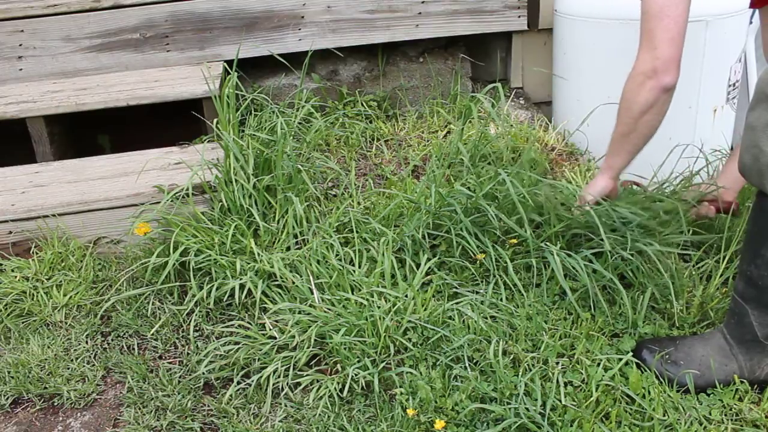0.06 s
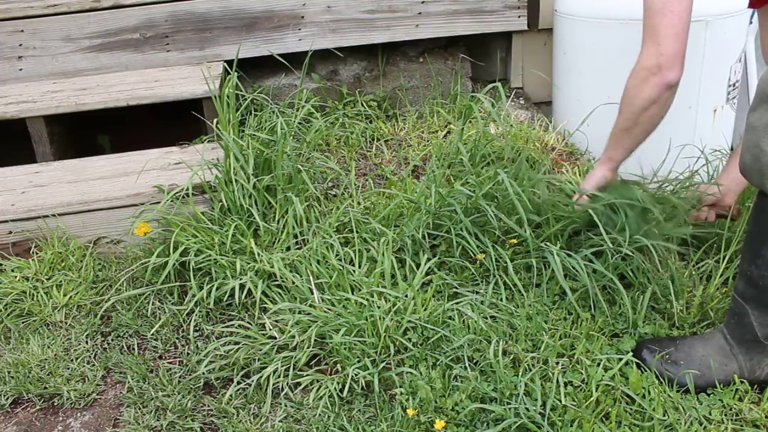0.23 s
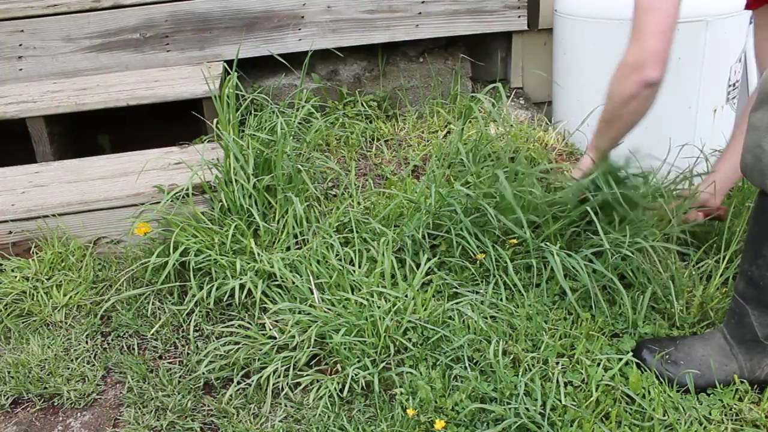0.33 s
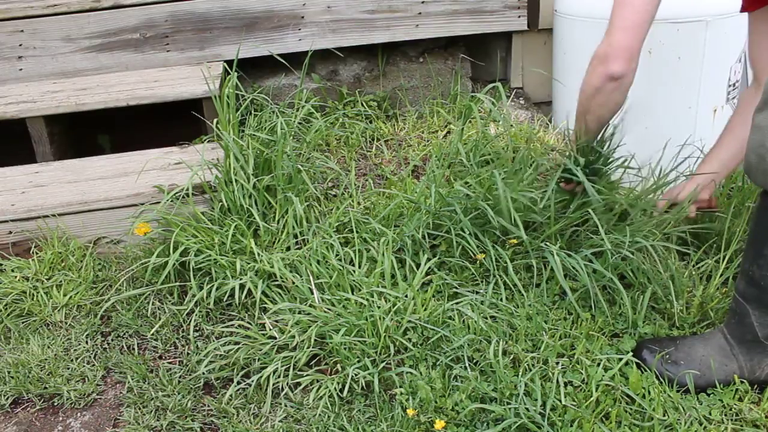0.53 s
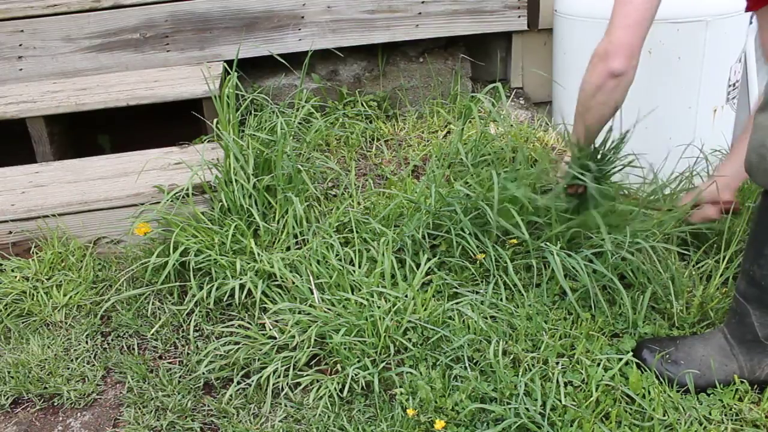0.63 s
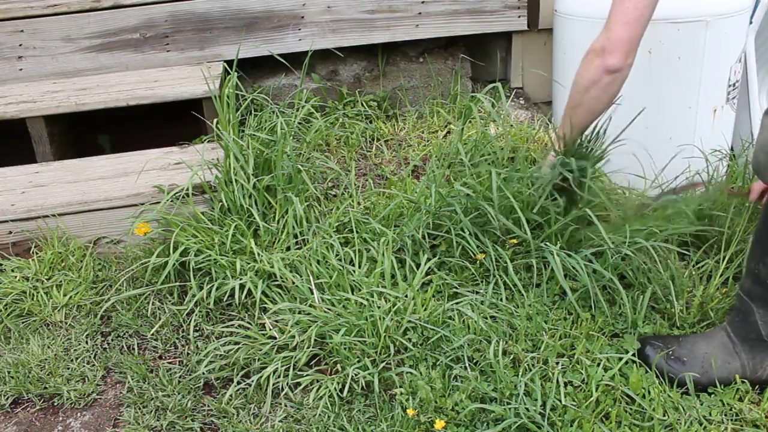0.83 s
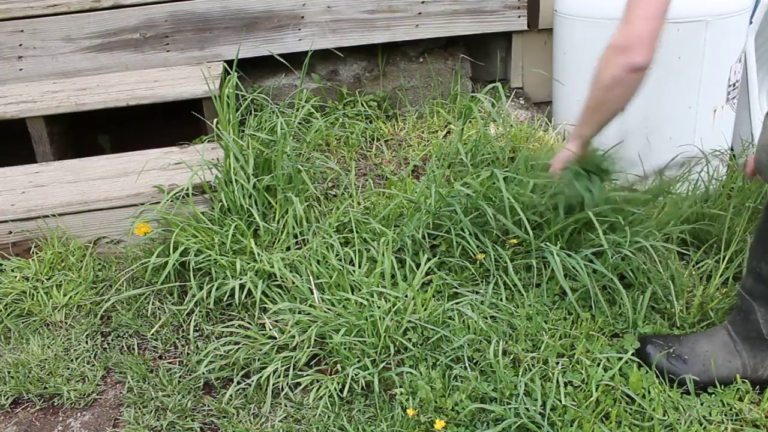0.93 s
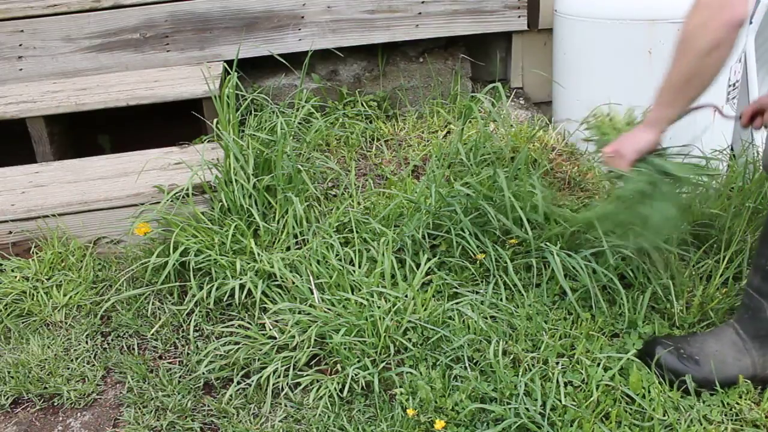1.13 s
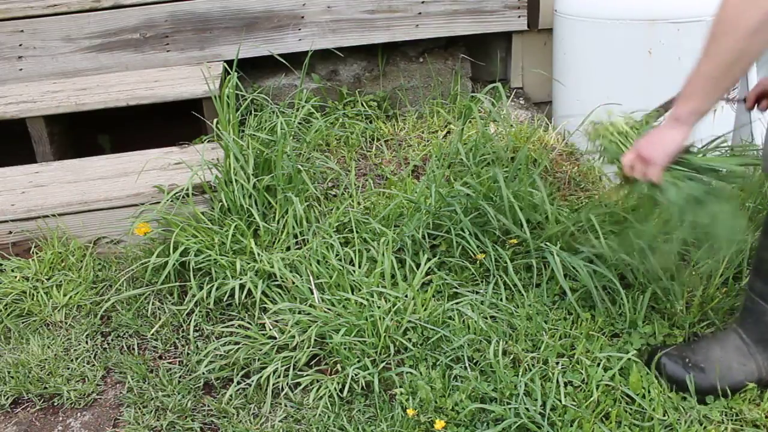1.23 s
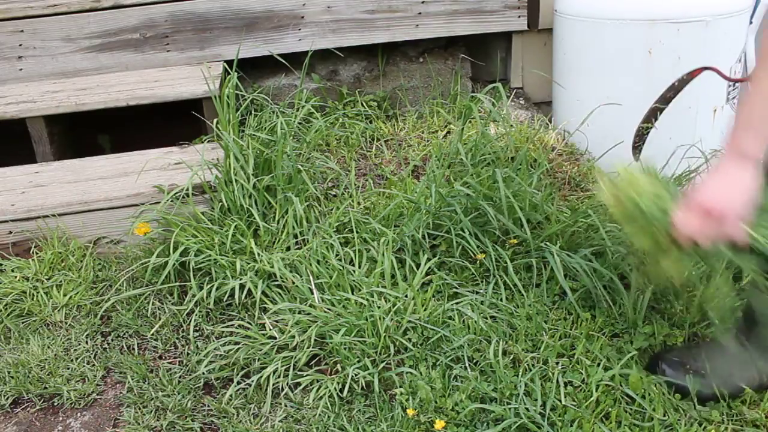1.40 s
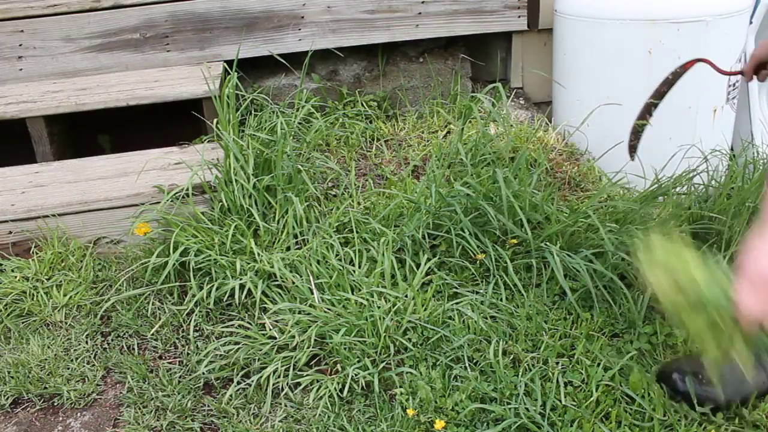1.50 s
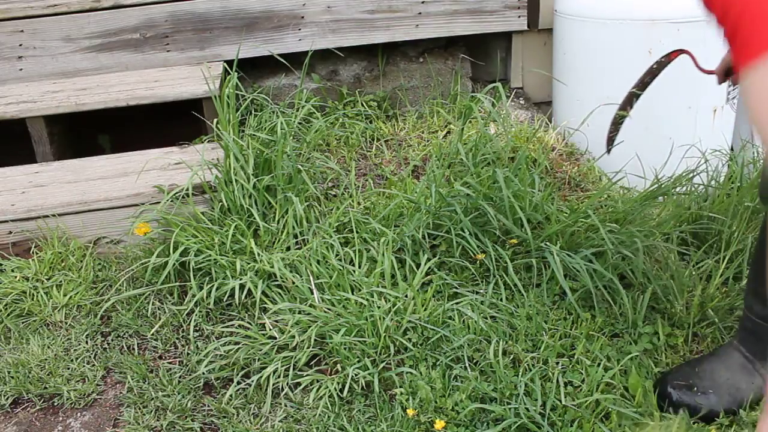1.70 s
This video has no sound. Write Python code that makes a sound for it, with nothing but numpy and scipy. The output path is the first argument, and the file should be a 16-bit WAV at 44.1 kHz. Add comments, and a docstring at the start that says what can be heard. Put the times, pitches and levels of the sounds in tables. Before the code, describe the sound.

A curved blade cuts through tall grass, close by in a quiet yard. First the gathered leaves rustle and tick, with a small snap near 0.25 seconds. From 0.6 to 0.85 seconds comes the cut, a tearing rasp with quick stalk snaps and a faint steel ring, loudest at 0.75. The bunch then lifts away with a soft swish around 1.3 seconds, and a boot bumps the turf faintly near 1.4.

```python
"""A curved steel hook cuts through a bunch of tall grass: fibres tear with a rasp, and the
hollow stalks break in a quick run of snaps that make the blade ring. First a hand gathers the
grass, so the leaves rustle and tick; afterwards the cut bunch is lifted away with a swish.
A boot shifts on the turf, and a house wall close by adds short echoes. The sound is mono."""
import sys
import numpy as np
from scipy import signal
from scipy.io import wavfile

SR = 44100
rng = np.random.default_rng(int(sys.argv[2]) if len(sys.argv) > 2 else 0)


def dump(signal):
    """Clip the signal to [-1, 1] and save it as 16-bit WAV at the path in sys.argv[1]."""
    limited = np.clip(np.atleast_2d(signal).T, -1, 1)
    pcm = np.round(limited * 32767).astype(np.int16)
    wavfile.write(sys.argv[1], SR, pcm)


N = 77175
T = np.arange(N) / SR


def amp(db):
    """Turns decibels into a number to multiply by."""
    return 10 ** (np.asarray(db) / 20)


def evened(x):
    """Scales a sound to an average strength (rms) of 1."""
    return x / np.sqrt(np.mean(x ** 2) + 1e-20)


def unit(x):
    """Scales a sound to a total energy of 1."""
    return x / (np.linalg.norm(x) + 1e-12)


def add(mix, s, sound):
    """Mixes a sound in, starting at s seconds."""
    part = mix[max(round(s * SR), 0):][:len(sound)]
    part += sound[:len(part)]


def level(curve):
    """Joins (t/s, level/dB) points into a volume curve, silent from 0.05 s beyond each end."""
    s, db = np.transpose(curve)
    return amp(np.interp(T, s, db)) * (T > s[0] - .05) * (T < s[-1] + .05)


def colour(x, points, size=4096):
    """Shapes the tone; the (f/Hz, level/dB) points set only the balance of low and high."""
    hz, db = np.transpose(points)
    log_hz = np.log(abs(np.fft.fftfreq(size, 1 / SR)) + 1)
    log_gain = np.log(amp(np.interp(log_hz, np.log(hz), db)))
    response = np.exp(np.conj(signal.hilbert(log_gain)))  # never rings ahead of a click
    taps = np.fft.ifft(response).real[:size // 2]
    return signal.fftconvolve(x, unit(taps))[:len(x)]


def crackle(per_s, spread_db, count=N):
    """Random clicks of uneven size, about per_s of them a second."""
    size = amp(spread_db * np.minimum(rng.exponential(1, count), 5))
    return evened(size * rng.choice([-1., 1.], count) * (rng.random(count) < per_s / SR))


def band(x, hz, octaves):
    """Favours the pitches within so many octaves either side of hz."""
    edges = np.clip([hz / 2 ** octaves, hz * 2 ** octaves], 20, [SR * .45, SR * .49])
    return signal.lfilter(*signal.butter(1, edges, "band", fs=SR), x)


# tone of the outdoor air: f/Hz, level/dB
AIR_TONE = [(30, -28), (42, -18), (50, 3), (80, -3), (134, 0), (200, -3), (450, 1), (800, -2.5),
            (2100, -3.5), (3000, -7.5), (8300, -5), (12000, -17.5), (16000, -9)]
def air(db=-56):
    """Still outdoor air makes a faint, steady hush."""
    return amp(db) * evened(colour(rng.standard_normal(N), AIR_TONE, size=8192))


# boot brushing the turf: t/s, level/dB, half length/s
BOOT_SCUFFS = [(0.247, -54.5, 0.01), (0.335, -56, 0.023), (1.22, -63, 0.048), (1.337, -58, 0.029),
               (1.433, -61, 0.037), (1.515, -58, 0.033), (1.645, -64.5, .06)]
# tone of the brushing: f/Hz, level/dB
SCUFF_TONE = [(60, -31), (130, -6), (300, 0.5), (600, -1.5), (1500, -4), (4000, -20), (16000, -27)]
# soft bumps on the ground: t/s, level/dB, f/Hz
BOOT_THUDS = [(0.754, -48.5, 235), (1.168, -52, 195), (1.412, -46.5, 147), (1.452, -49.5, 140)]
def boot(rise_s=0.0033, pitch_sag=0.17):
    """A boot brushes soft ground and bumps it; each low bump drops in pitch."""
    swells = sum(amp(db) * np.exp(-.5 * ((T - s) / half) ** 2) for s, db, half in BOOT_SCUFFS)
    out = colour(swells * crackle(per_s=4000, spread_db=2.0), SCUFF_TONE)
    age = T[:4000] / rise_s
    fade = np.exp(1 - age)
    for s, db, hz in BOOT_THUDS:
        turns = np.cumsum(hz * (1 + pitch_sag * (fade - 1))) / SR
        add(out, s, amp(db) * age * fade * np.sin(2 * np.pi * turns))
    return out


# cut bunch sliding out and swinging away: t/s, level/dB
LIFT_LEVELS = [(.86, -63), (.95, -63), (1.08, -60), (1.15, -57), (1.24, -61), (1.32, -52.5), (1.37, -69),
               (1.47, -65), (1.52, -59), (1.57, -68)]
# tone of its swish: f/Hz, level/dB
SWISH_TONE = [(1500, -23), (4000, -5), (7000, 1.5), (10000, 0.5), (13000, 0.5), (16000, -5)]
def lift():
    """Loose cut leaves slide over each other with a fine, high swish."""
    return level(LIFT_LEVELS) * colour(crackle(per_s=11000, spread_db=3.5), SWISH_TONE)


# hand and blade moving in the leaves: t/s, level/dB
RUSTLE_LEVELS = [(0, -48), (.04, -51.5), (.075, -48), (.125, -47), (.145, -51.5), (.21, -51), (.245, -45),
                 (.285, -53.5), (.34, -48), (.44, -47), (.55, -54.5), (.63, -50.5), (.8, -47.5), (.89, -54),
                 (1.06, -57), (1.17, -54.5), (1.33, -60.5), (1.38, -60), (1.47, -60.5), (1.52, -56.5),
                 (1.56, -62), (1.75, -64)]
# tone of the leaves: f/Hz, level/dB
LEAF_TONE = [(120, -11), (200, 6), (227, -23), (268, 1), (440, -10.5), (612, -2.5), (1060, -4.5),
             (3690, 0.5), (7000, -1.5), (16000, -14.5)]
def rustle(taps_per_s=5000, pitches=14, hiss_gain=0.63):
    """Leaves rub and tap at many different pitches, over a fine hiss."""
    taps = sum(band(crackle(taps_per_s / pitches, spread_db=-1.5), hz, octaves=1300 / (hz + 1000))
               for hz in np.linspace(1000, 15000, pitches))
    hiss = hiss_gain * rng.standard_normal(N)
    return level(RUSTLE_LEVELS) * evened(colour(evened(taps) + hiss, LEAF_TONE))


# leaves flicking free: t/s, level/dB, f/Hz, half width/octaves, fade time/s
LEAF_TICKS = [(.1523, -38, 7000, 0.26, 0.002), (0.187, -36, 8700, .25, 0.0011),
              (0.229, -43, 5500, 0.28, .002), (0.513, -43, 4760, 0.36, 0.0027),
              (0.571, -45, 2800, 0.43, 0.0018), (1.032, -43, 5130, 0.13, .0015),
              (1.0995, -42.5, 7000, .4, 0.0011), (1.112, -50.5, 12800, .08, .01),
              (1.332, -46.5, 3970, 1, 0.0043), (1.513, -42, 6500, .9, .0015), (1.5215, -46, 5000, .9, .002),
              (1.5598, -48, 9000, .4, .001), (1.611, -51.5, 8500, .13, 0.01)]
def ticks(size=3000):
    """Single leaves flick past the hand, each a tiny burst of noise."""
    out = np.zeros(N)
    for s, db, hz, octaves, fade_s in LEAF_TICKS:
        noise = evened(band(rng.standard_normal(size), hz, octaves))
        add(out, s, amp(db) * np.exp(-T[:size] / fade_s) * noise)
    return out


# echoes from the wall and steps close by: delay t/s, level/dB
WALL_ECHOES = [(.0041, -18), (.0072, -25), (0.0166, -18)]
def yard(x, tail_db=-13, fade_s=0.35, rise_s=0.013):
    """Sound bounces back as a few quick echoes and a thin tail that falls 60 dB in fade_s."""
    t = T[:SR // 2]
    bounces = crackle(per_s=2500, spread_db=-3.5, count=len(t))
    tail = amp(tail_db) * unit(bounces * amp(-60 * t / fade_s) * np.minimum(t / rise_s, 1))
    for s, db in WALL_ECHOES:
        add(tail, s, amp(db) * np.array([.5, .5]))  # spread over two samples to soften the treble
    return x + signal.fftconvolve(x, tail)[:N]


def slide(at_s=0.8, half_s=0.033, db=-49.5):
    """The flat of the blade slides out past the stubble with a thin scrape."""
    swell = np.exp(-.5 * ((T - at_s) / half_s) ** 2)
    return amp(db) * swell * evened(band(rng.standard_normal(N), hz=6200, octaves=0.21))


# notes of the steel hook: f/Hz, relative level/dB, time to fade 60 dB when free/s
BLADE_NOTES = [(1370, -1, 0.099), (1804, 2, 0.23), (2230, 1.5, .2), (2590, 2, .12), (2894, -3, .17),
               (3420, -7, 0.098), (3820, 3, 0.068), (4400, -1.5, 0.22), (5005, -17, 0.5), (5520, -0.5, 0.5),
               (6005, -8, 0.45), (6200, -2, .2), (7840, 1, .08)]
def blade(cut, damped_s=0.031, damped_db=-15, free_db=-20):
    """The cut shakes the steel. The grass stops most of the ring at once; a faint part lingers."""
    t = T[:16384]
    damped = free = 0
    for hz, db, free_s in BLADE_NOTES:
        note = amp(db) * np.cos(2 * np.pi * hz * t)
        damped += note * amp(-60 * t / damped_s)
        free += note * amp(-60 * t / free_s)
    ring = amp(damped_db) * unit(damped) + amp(free_db) * unit(free)
    return signal.fftconvolve(cut, ring)[:N]


# edge pulled through the stalks: t/s, relative level/dB
STROKE_LEVELS = [(.56, -62.5), (.6, -46), (.642, -41.5), (.659, -33), (.683, -38), (.722, -33), (.75, -40),
                 (.785, -43.5), (.82, -50), (.88, -71)]
# tone of the tearing: f/Hz, level/dB
TEARING_TONE = [(71, -63), (120, -27), (503, -10), (568, -13), (656, -11), (948, -14), (1290, -7.5),
                (2190, -4), (2920, -10), (3170, -8), (4050, -8.5), (8130, -8), (16000, -15)]
def tearing(fibres_per_s=6000, hiss_gain=0.57):
    """Fibres part along the moving edge, so fast that their clicks blur into a rasp."""
    fibres = evened(crackle(fibres_per_s, spread_db=2.5) + hiss_gain * rng.standard_normal(N))
    return colour(fibres * level(STROKE_LEVELS), TEARING_TONE)


# stalks breaking: t/s, relative level/dB, length/s, dull above f/Hz, stem f/Hz, stem level/dB
STALK_SNAPS = [(.2408, -36.5, 0.0022, 12000, 1900, -9), (0.2463, -33.5, 0.002, 12000, 4200, -5),
               (.6139, -35.5, 0.0011, 12000, 3800, -1), (.6344, -41, 0.0008, 6950, 1800, 3),
               (0.6506, -33.5, .002, 12000, 7240, 7), (.6565, -33, .008, 13000, 2560, -1.5),
               (0.6727, -36.5, 0.0054, 11000, 8100, 4), (0.6875, -37, .004, 11000, 610, 14),
               (0.6997, -33, 0.0037, 7000, 3930, 8), (0.7129, -27.5, 0.0044, 13000, 1350, 9),
               (0.7165, -33, .008, 14000, 1750, 6), (0.7286, -31, 0.0064, 15000, 1900, -2),
               (.7368, -30, 0.0004, 8900, 5400, -2), (0.7426, -35, 0.00087, 12000, 6000, 3),
               (.7548, -23.5, .0062, 6700, 3800, -6), (0.773, -45, 0.0076, 4000, 1200, 11)]
# tone shared by all the snaps: f/Hz, level/dB
STALK_TONE = [(100, -20), (250, -15), (700, -5), (1300, -7.5), (2100, 1.5), (3200, -4.5), (4200, -2),
              (7000, -2), (11000, -3), (16000, -4.5)]
def snaps(crack_s=0.00046, crack_share=0.18, splinters_per_s=13000, size=2048):
    """Each stalk breaks with a short crack and a spray of splinters that sound its hollow stem."""
    out, t = np.zeros(N), T[:size]
    for s, db, length, top_hz, stem_hz, stem_db in STALK_SNAPS:
        crack = unit(rng.choice([-1., 1.], size) * np.exp(-(t / crack_s) ** 2))
        splinters = crackle(splinters_per_s, spread_db=1.5, count=size)
        spray = unit(splinters * np.exp(-(t / length) ** 2))
        burst = np.sqrt(crack_share) * crack + np.sqrt(1 - crack_share) * spray
        stem = amp(stem_db) * band(burst, stem_hz, octaves=.22)
        snap = signal.lfilter(*signal.butter(4, top_hz, fs=SR), burst + stem)
        add(out, s, amp(db) * np.sqrt(length * SR) * snap)  # longer snaps carry more energy
    return colour(out, STALK_TONE)


def scene():
    """The cut, its ring and the ticks echo in the yard; the softer sounds are added on top."""
    cut = amp(-2) * (tearing() + snaps()) + slide()
    hush = air()
    mono = yard(cut + blade(cut) + ticks()) + rustle() + lift() + boot() + hush
    return np.array([mono, mono])


def record(dry, low_hz=44, high_hz=15880):
    """Takes away the deepest rumble and the very highest treble."""
    thinned = signal.sosfilt(signal.butter(3, low_hz, "high", fs=SR, output="sos"), dry)
    treble_cut = signal.firwin(601, high_hz, window=("kaiser", 9), fs=SR)
    return signal.oaconvolve(thinned, treble_cut[None], "same")


dry = scene()
out = record(dry)
dump(out)
```